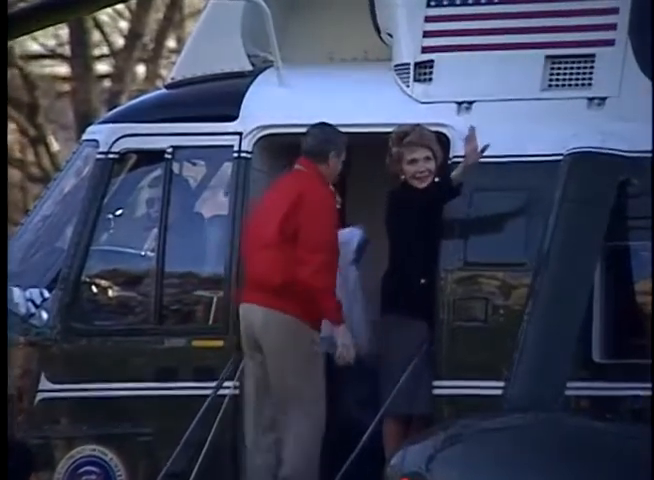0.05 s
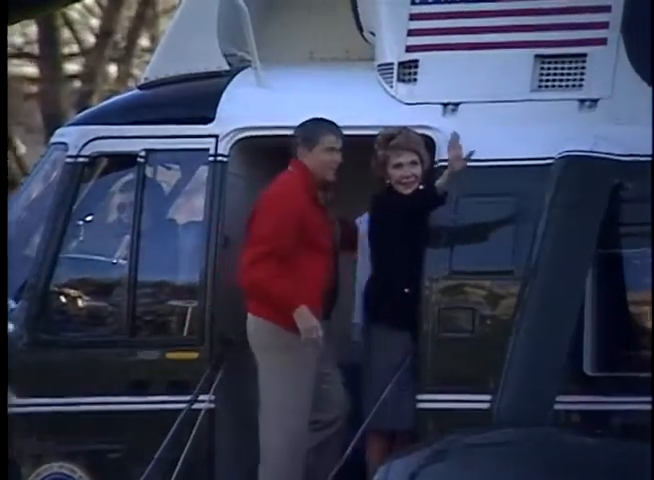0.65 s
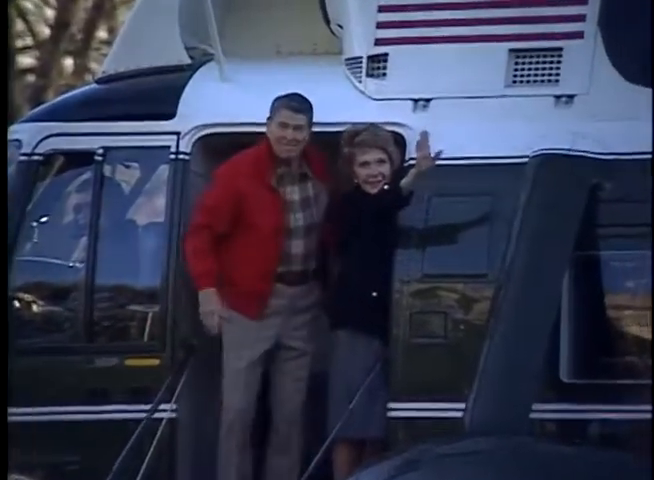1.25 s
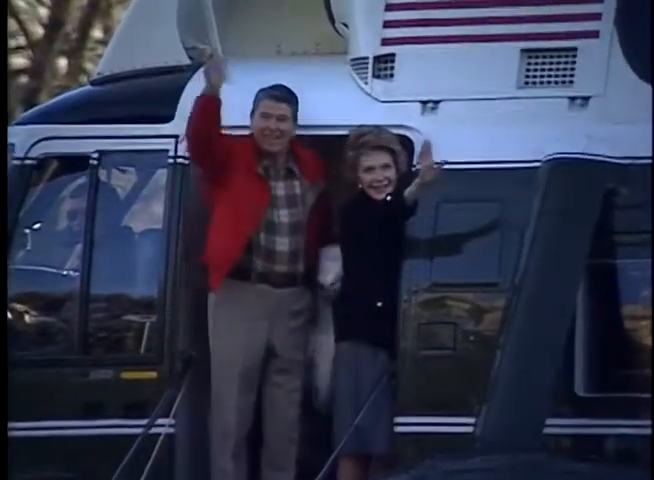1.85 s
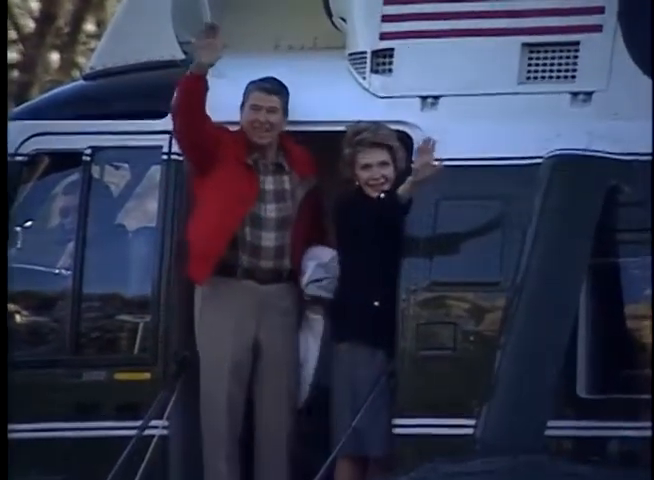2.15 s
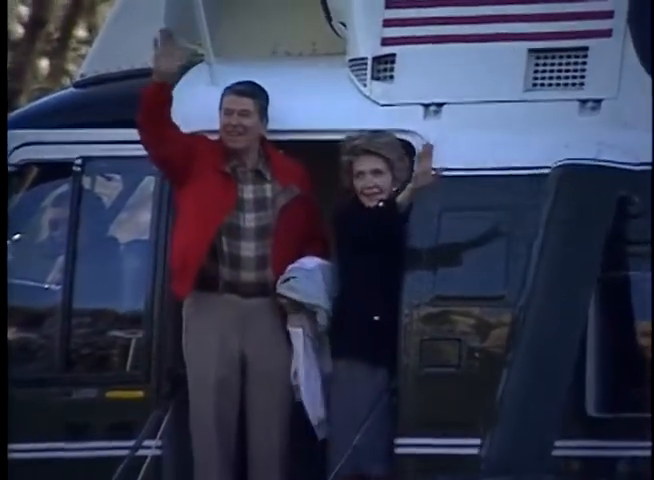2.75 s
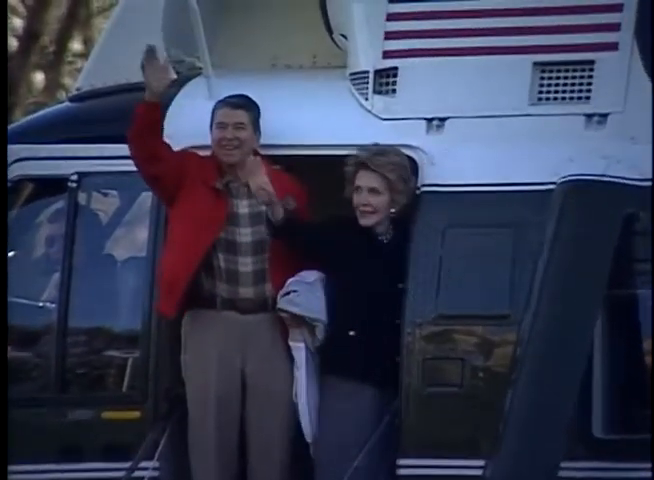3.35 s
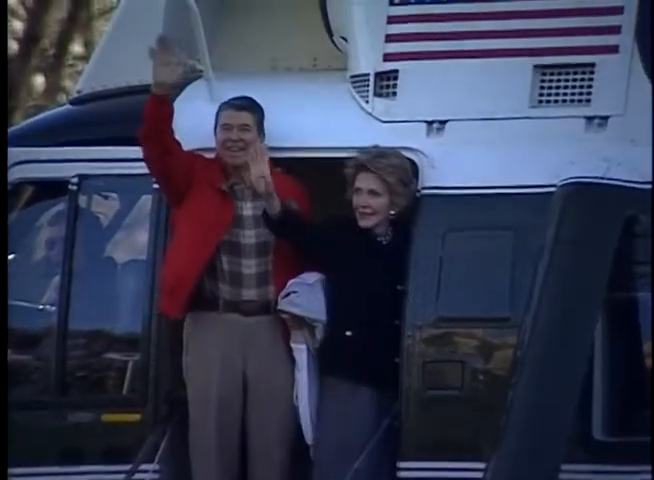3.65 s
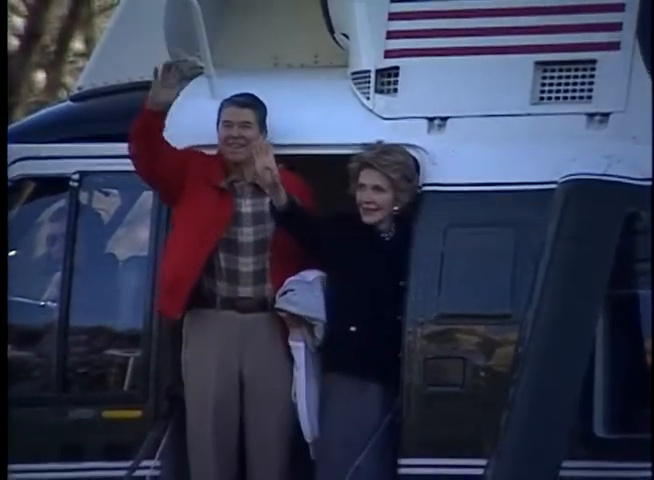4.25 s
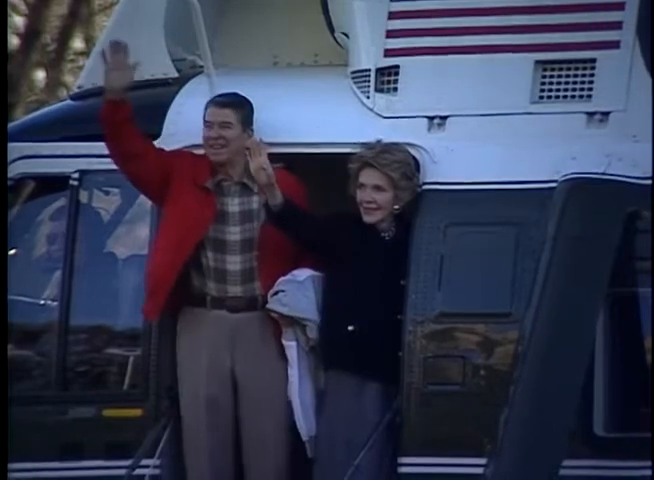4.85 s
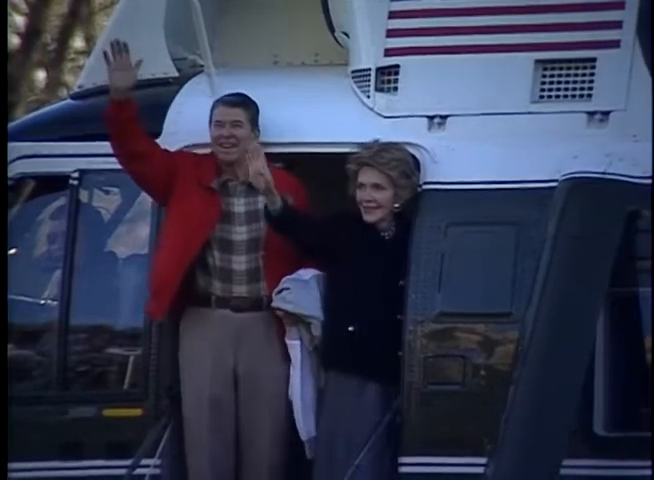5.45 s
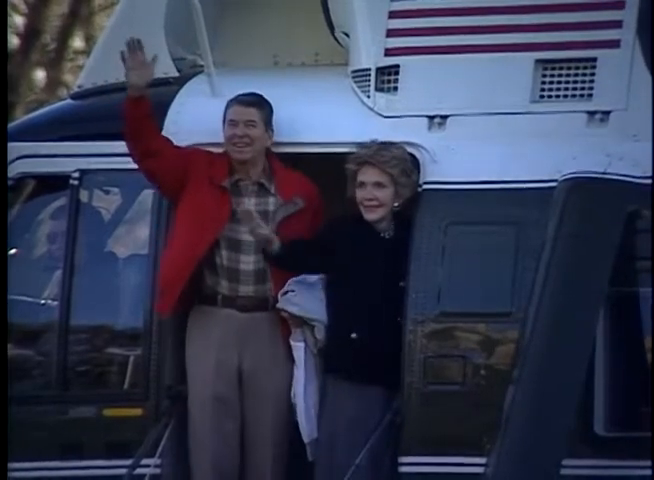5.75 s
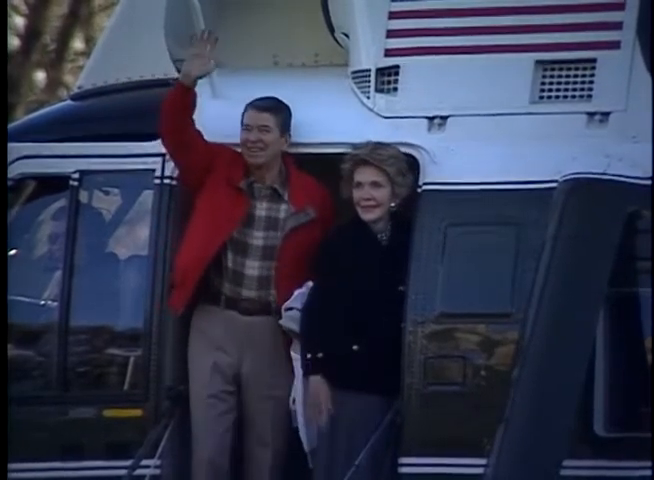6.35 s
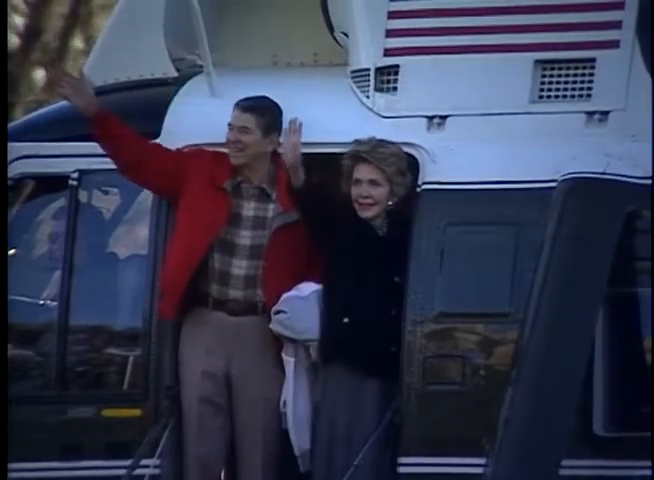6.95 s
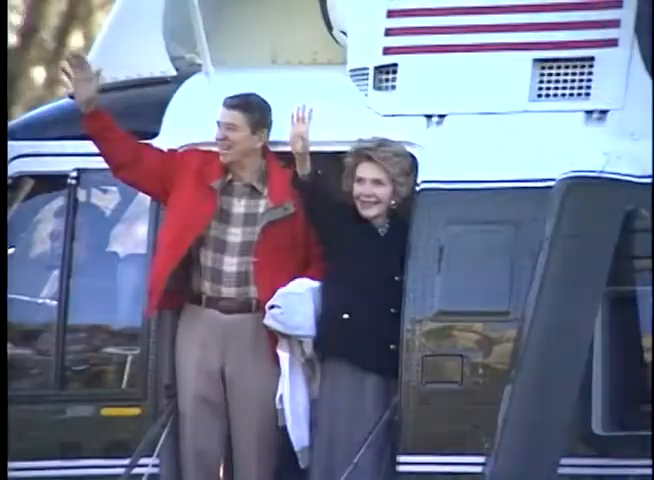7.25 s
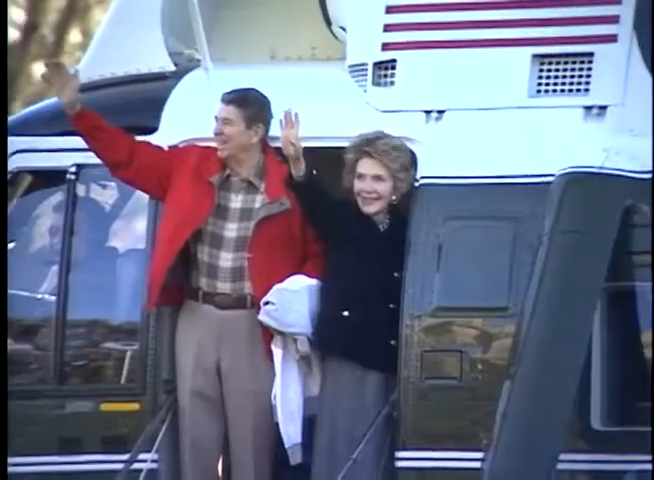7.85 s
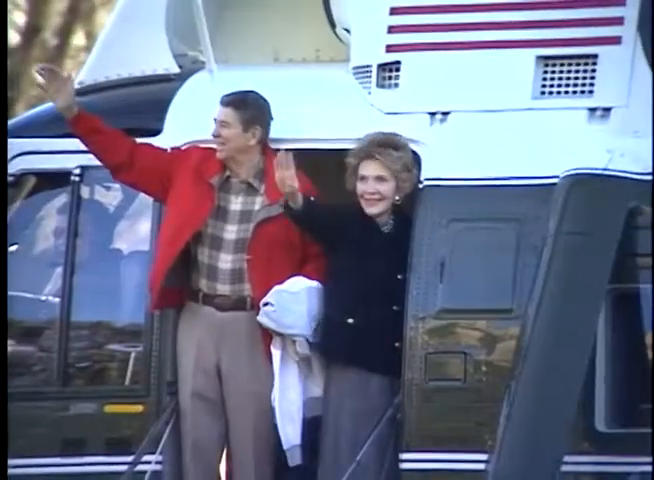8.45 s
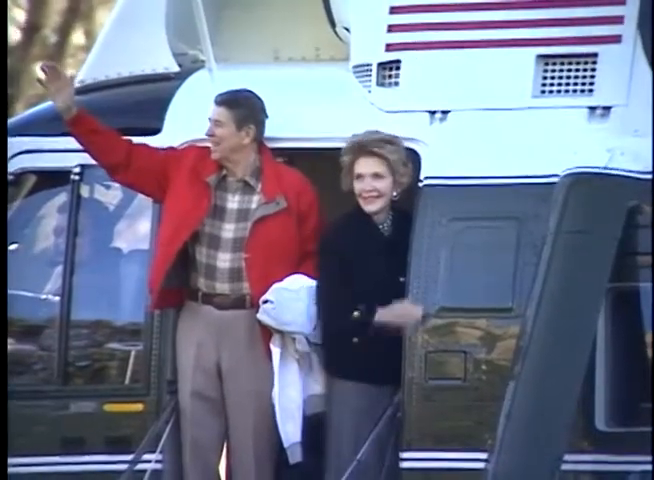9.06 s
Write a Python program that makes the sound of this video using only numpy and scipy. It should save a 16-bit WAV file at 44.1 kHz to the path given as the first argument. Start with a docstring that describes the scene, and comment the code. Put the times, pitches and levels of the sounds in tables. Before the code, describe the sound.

Steady hissing rush of an idling helicopter's turbines, with a wavering high-pitched whine above a soft low rumble.

```python
"""A twin-turbine helicopter idles on an open lawn, heard from some way off.
Jet turbulence and combustion make the exhausts rush and rumble, indrawn air hisses, and gears hum.
Two compressors whine at slightly different blade-passing frequencies; hot, ever more turbulent air
scatters the whine, so that it fades and flutters. Interference with the ground reflection hollows
the rush. Two faint knocks sound late on."""
import sys
import numpy as np
from scipy import signal
from scipy.fft import rfft, irfft, next_fast_len
from scipy.io import wavfile

SR = 44100
rng = np.random.default_rng(int(sys.argv[2]) if len(sys.argv) > 2 else 0)


def unload_audio(sound):
    """Save the sound as a 16-bit wav file, at the path given as the first command line argument."""
    columns = np.transpose(np.atleast_2d(sound))
    # keep every value between -1 and 1, then stretch to whole-number steps
    steps = np.round(np.clip(columns, -1, 1) * 32767)
    wavfile.write(sys.argv[1], SR, steps.astype(np.int16))


N = 406586

# broad noise carried through the air: t/s, relative rush level/dB, relative hiss level/dB
TRANSMISSION = [(0.0, -34.5, -26.5), (0.51, -32.5, -25.5), (0.56, -36, -27), (1.18, -34.5, -27),
                (2.18, -35, -28.5), (3.57, -34.5, -26.5), (4.44, -36.5, -29), (5.52, -33.5, -27),
                (6.52, -34, -29), (6.93, -41.5, -31.5), (7.16, -36.5, -31), (7.55, -45, -37.5),
                (7.7, -40.5, -33.5), (8.4, -36.5, -29.5), (8.52, -39, -33.5), (8.96, -41, -35.5),
                (9.17, -37, -30.5), (9.22, -40, -34)]
# spectrum of the exhaust rush: f/Hz, relative density/dB
RUSH_SPECTRUM = [(350, -33), (620, -16.5), (800, -8), (1000, -3.5), (1250, -2), (1650, -4), (2000, -3),
                 (2500, -7.5), (3300, -8), (5000, -47)]
# duct resonances: f/Hz, width/Hz, added peak re the plain rush/dB
DUCT_MODES = [(737, 19, -2), (982, 33, -6.5), (1185, 72, -3), (1353, 32, 0), (1540, 176, 0.5),
              (1804, 65, 0), (2075, 67, -10)]
# combustion rumble: t/s, relative level/dB
RUMBLE_LEVEL = [(0, -40.5), (0.8, -40), (1.2, -42.5), (1.8, -37.5), (3, -37.5), (4.3, -41.5), (5.3, -42),
                (7, -40), (7.5, -41.5), (9.22, -40.5)]
# spectrum of the rumble round the tailpipe resonance: f/Hz, relative density/dB
RUMBLE_SPECTRUM = [(20, -44), (42, -45), (80, -21), (108, -17.5), (135, -6.5), (157, 3), (186, -1),
                   (222, -14.5), (260, -13), (350, -15.5), (460, -19), (540, -18.5), (660, -26.5),
                   (1200, -27)]
# spectrum of the intake hiss: f/Hz, relative density/dB
HISS_SPECTRUM = [(1500, -25.5), (2500, -8.5), (3200, -3), (4000, -0.9), (5000, -1), (6200, 1.5),
                 (7200, -0.4), (8300, -1.5), (9300, -7), (10500, -10.5), (12300, -14), (13800, -14.5),
                 (14600, -27), (15700, -24)]
# ground reflection: t/s, lag/ms, strength (0-1)
REFLECTION = [(0, .76, 0.02), (1, 0.61, 0.05), (2.9, 0.56, 0.07), (3.7, .46, 0.4), (4.4, 0.5, 0.2),
              (5.4, 0.523, 0.24), (6.6, 0.54, 0.26), (7.4, 0.63, 0), (8.4, .59, 0.28), (9.22, .62, 0.1)]
# blade-passing frequencies of the compressors: t/s, first f/Hz, second f/Hz
BLADE_PASSING = [(0, 7387, 7208), (1.5, 7397, 7209), (3, 7393, 7207), (5.2, 7383, 7206), (5.9, 7374, 7205),
                 (7.3, 7375, 7196), (8.1, 7383, 7197), (9.2, 7384, 7202)]
# first compressor's whine carried through the air: t/s, relative level/dB
WHINE_LEVEL = [(0.0, -20.5), (0.16, -37), (0.22, -18), (0.32, -36), (0.56, -22), (0.66, -28.0),
               (0.94, -20.5), (1.06, -36), (1.12, -25.5), (1.6, -25), (1.82, -31.5), (2.08, -18),
               (2.3, -29.5), (2.76, -24), (3.54, -30.5), (3.86, -25), (4.86, -32.5), (5.0, -28),
               (6.08, -34.5), (6.42, -26), (6.64, -34.5), (7.16, -23.5), (7.46, -38), (8.36, -25.5),
               (8.54, -34), (9.21, -31)]
# gearbox hum: t/s, level/dB
HUM_LEVEL = [(0, -69), (4.5, -65), (6, -61), (7, -60), (9.22, -62.5)]
# gear and pump tones: f/Hz, level re the hiss curve/dB, spread/Hz
GEAR_TONES = [(311, -36, 3), (1060, -30, 2), (1478, -31, 3), (1799, -27.5, 3), (3446, -25, 6),
              (3965, -23, 30), (7654, -21.5, 7), (8868, -16.5, 14)]
# hollow knocks: t/s, peak level/dB, ring f/Hz
KNOCK_EVENTS = [(6.173, -39, 555), (6.644, -38.5, 647)]
# modes of a knock: multiple of the ring frequency, relative level/dB
RING_MODES = [(.92, -3), (1, 0), (1.15, -5)]


def undb(db):
    """Amplitude grows tenfold for every 20 dB."""
    return 10 ** (np.asarray(db) / 20)


def unit(x):
    """Normalisation to rms 1."""
    return x / np.sqrt(np.mean(np.abs(x) ** 2))


def curves(table):
    """Linear interpolation of each column of a timed table, sample by sample."""
    times, *columns = np.transpose(table)
    return [np.interp(np.arange(N) / SR, times, column) for column in columns]


def noise(gain_at):
    """Spectral shaping of white noise by a gain rule, at rms 1."""
    size = next_fast_len(N)
    f = np.arange(size // 2 + 1) * SR / size
    spectrum = rfft(rng.standard_normal(size)) * gain_at(f)
    return unit(irfft(spectrum, size)[:N])


def colour(outline, f):
    """Gain of a spectral envelope, interpolated in log frequency."""
    hz, db = np.transpose(outline)
    return undb(np.interp(np.log(f + 1), np.log(hz), db))


def wander(rate_hz):
    """Low-pass random fluctuation of rms 1, mostly slower than the given rate."""
    return noise(lambda f: 1 / (1 + (f / rate_hz) ** 2))


def scatter(rate_hz):
    """Rayleigh fading: many shifting air paths sum to a random amplitude and phase."""
    return unit(wander(rate_hz) + 1j * wander(rate_hz))


def flutter(share, rate_hz):
    """Interference of a direct path with a scattered share; swells are rounded off, fades stay deep."""
    paths = np.sqrt(1 - share) + np.sqrt(share) * scatter(rate_hz)
    return unit(paths / np.sqrt(1 + np.abs(paths) ** 2 / 2))


def tone(hz, amplitude):
    """A sinusoid of complex rms amplitude, whose phase is the integral of frequency."""
    cycles = np.cumsum(hz * np.ones(N)) / SR
    return np.sqrt(2) * np.real(amplitude * np.exp(2j * np.pi * cycles))


def exhaust_rush(rush_db):
    """Jet turbulence radiates broad noise, reinforced at the duct resonances."""
    def gain_at(f):
        lift = sum(undb(db) / (1 + (2 * (f - hz) / width) ** 2) for hz, width, db in DUCT_MODES)
        return colour(RUSH_SPECTRUM, f) * (1 + lift)
    return noise(gain_at) * undb(rush_db + 0.4 + 0.61 * wander(rate_hz=5.9))


def combustion_rumble(throb_hz=10.3):
    """Combustion drives the tailpipe resonance, which throbs unevenly amid a steadier rumble."""
    (level_db,) = curves(RUMBLE_LEVEL)
    rumble = noise(lambda f: colour(RUMBLE_SPECTRUM, f))
    pipe = signal.sosfiltfilt(signal.butter(3, [110, 225], "band", fs=SR, output="sos"), rumble)
    throb_db = tone(throb_hz + 2.5 * wander(rate_hz=2.86), amplitude=0.91)
    return pipe * undb(level_db + throb_db - 0.3) + (rumble - pipe) * undb(level_db + 1.66)


def intake_hiss(hiss_db):
    """Flow noise of the indrawn air; its top octave swells and fades further than the rest."""
    hiss = noise(lambda f: colour(HISS_SPECTRUM, f))
    top = signal.sosfiltfilt(signal.butter(2, 9500, "high", fs=SR, output="sos"), hiss)
    top_db = 0.36 * (hiss_db - hiss_db.mean()) + 0.49 * wander(rate_hz=13)
    hiss = hiss + top * (undb(top_db) - 1)
    return hiss * undb(hiss_db + 2.0 + 0.55 * wander(rate_hz=8.3))


def ground_reflection(direct, cutoff_hz):
    """Comb filtering: the direct sound interferes with a late copy whose treble the grass absorbs."""
    lag_ms, strength = curves(REFLECTION)
    dull = signal.sosfiltfilt(signal.butter(1, cutoff_hz, fs=SR, output="sos"), direct)
    samples = np.arange(N)
    return direct + strength * np.interp(samples - lag_ms * SR / 1000, samples, dull)


def compressor_whine(hiss_db, ceiling_db=-18.5):
    """Passing blades radiate two tones, each with its octave; scattering by eddies makes them fade."""
    first_hz, second_hz = curves(BLADE_PASSING)
    first_hz = first_hz + 3 * wander(rate_hz=6.1)
    (whine_db,) = curves(WHINE_LEVEL)
    # the scattered share rises as the air grows more turbulent
    (rising_share,) = curves([(0, 0.06), (6.6, 0.63)])
    large_eddies = np.abs(flutter(share=0.34, rate_hz=16))
    small_eddies = flutter(rising_share, rate_hz=38)
    carried = undb(whine_db + 3) * large_eddies * small_eddies
    limited = carried / (1 + np.abs(carried / undb(ceiling_db)) ** 4) ** 0.25
    first = tone(first_hz, limited)
    rough_skirt = tone(first_hz + 25, scatter(rate_hz=30)) * undb(hiss_db - 10)
    # the second whine and the octaves share the path of the hiss, and also fade on their own
    second = tone(second_hz, flutter(share=0.19, rate_hz=26))
    second *= undb(hiss_db - 11 + 2.8 * wander(rate_hz=6.6))
    first_octave = tone(2 * first_hz, flutter(share=0.9, rate_hz=30))
    first_octave *= undb(hiss_db - 18 + 2.0 * wander(rate_hz=5))
    second_octave = tone(2 * second_hz, scatter(rate_hz=12)) * undb(hiss_db - 32)
    return first + rough_skirt + second + first_octave + second_octave


def gears(hiss_db, hum_hz=530):
    """Periodic forces in gears and pumps radiate weak tones, each fading on its own."""
    (hum_db,) = curves(HUM_LEVEL)
    tones = tone(hum_hz, scatter(rate_hz=5.5)) * undb(hum_db)
    for hz, db, spread_hz in GEAR_TONES:
        # low tones diffract round the eddies and hold their level better
        carried_db = hiss_db.mean() + min(hz / 2000, 1) * (hiss_db - hiss_db.mean())
        tones += tone(hz, scatter(spread_hz)) * undb(db + carried_db)
    return tones


def knocks(t60_s, rise_s):
    """Damped free vibration: each soft blow excites a few close modes that decay exponentially."""
    blows, t = np.zeros(N), np.arange(N) / SR
    for onset_s, peak_db, hz in KNOCK_EVENTS:
        age = np.maximum(t - onset_s, 0)
        ring = sum(undb(db) * np.sin(2 * np.pi * hz * ratio * age) for ratio, db in RING_MODES)
        ring *= (1 - np.exp(-age / rise_s)) * np.exp(-np.log(1000) * age / t60_s)
        blows += undb(peak_db) * ring / np.abs(ring).max()
    return blows


def scene():
    """Superposition of all sources across the lawn, the same in both channels."""
    rush_db, hiss_db = curves(TRANSMISSION)
    roar = exhaust_rush(rush_db) + combustion_rumble() + intake_hiss(hiss_db)
    roar = ground_reflection(roar, cutoff_hz=4900)
    mono = roar + compressor_whine(hiss_db) + gears(hiss_db) + knocks(t60_s=0.062, rise_s=0.012)
    return np.array([mono, mono])


def record(dry):
    """Band limiting: an elliptic low-pass cuts the highest treble steeply."""
    return signal.sosfilt(signal.ellip(12, 0.1, 80, 15720, fs=SR, output="sos"), dry)


dry = scene()
out = record(dry)
unload_audio(out)
```